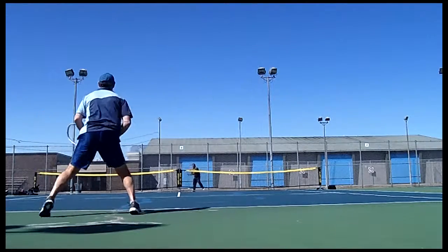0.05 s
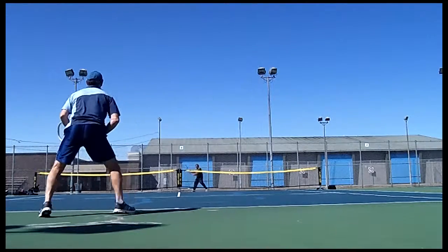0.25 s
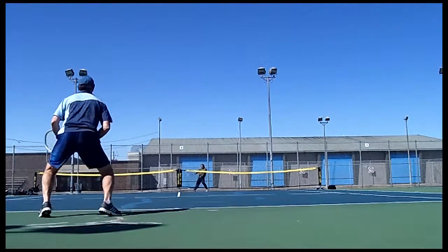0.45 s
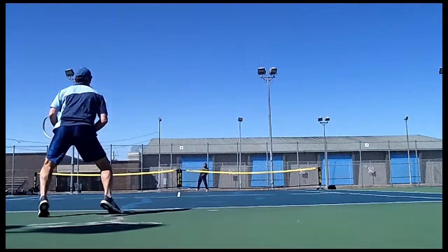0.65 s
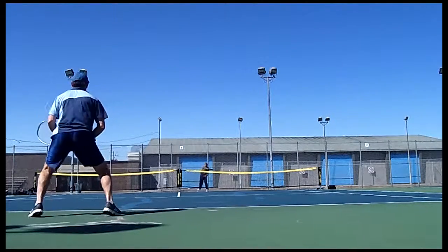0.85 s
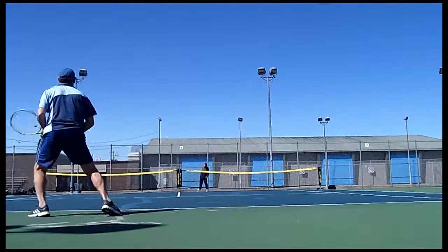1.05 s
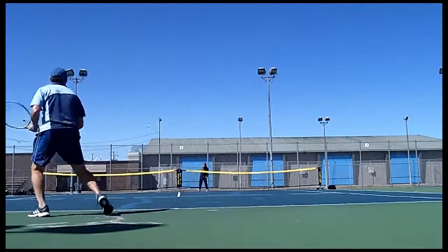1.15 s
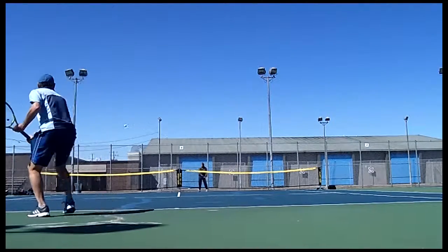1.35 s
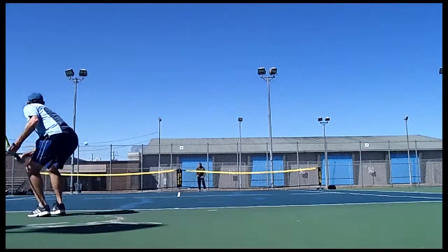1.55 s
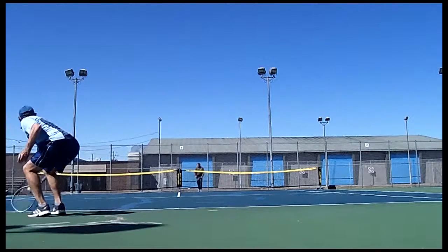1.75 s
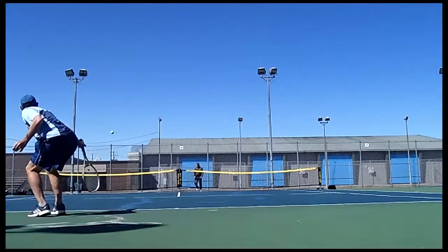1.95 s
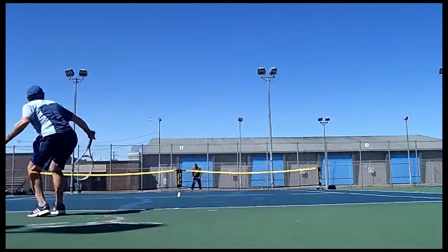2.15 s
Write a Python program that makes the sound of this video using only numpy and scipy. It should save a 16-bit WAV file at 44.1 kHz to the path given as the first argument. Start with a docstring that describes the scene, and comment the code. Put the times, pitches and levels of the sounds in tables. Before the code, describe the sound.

Two racket hits on a tennis ball, distant then near, amid squeaking shoes and wind.

```python
"""An outdoor hard tennis court, heard from behind the baseline during a rally.
A racket hits the ball twice, once farther off and once close by: a crack, a thump and ringing strings.
Rubber soles squeak as they stick and slip, and scuff as they drag over the gritty paint.
Fences and walls send back a thin echo, and wind buffets the microphone over a steady outdoor rush."""
import sys
import numpy as np
from scipy import signal
from scipy.fft import rfft, irfft
from scipy.io import wavfile
from scipy.ndimage import uniform_filter1d

SR = 44100
rng = np.random.default_rng(int(sys.argv[2]) if len(sys.argv) > 2 else 0)


def materialize(psi):
    """Save the field psi as 16-bit PCM at rate SR to the path in sys.argv[1].

    A 1-D psi becomes a single channel; in a 2-D psi each row is a channel.
    """
    bounded = np.clip(np.atleast_2d(psi).T, -1, 1)
    quanta = np.round(bounded * 32767).astype(np.int16)
    wavfile.write(sys.argv[1], SR, quanta)


N = 97020  # 2.2 seconds
FLUTTER_DB, FLUTTER_HZ = 2, 35.29  # how much and how fast the wind's loudness wavers


def ball_hits():
    """A hit cracks and rings the strings; the ball flattens with a thump and rings as it springs back."""
    # racket hits (time [s], thump level [dB], thump pitch [Hz], ball level [dB], ball pitch [Hz],
    # strings level [dB], crack level [dB], crack treble boost [dB per octave])
    hits = [(0.7126, -18, 382, -11.5, 1117, -44.5, -24, -4), (1.9108, -2.5, 321, -8, 970, -18, -13.5, 1.8)]
    # tones of the strings and frame (pitch [Hz], level [dB], time to fade by 60 dB [s])
    racket_tones = [(555, -7, 0.022), (802, 7.5, 0.03), (1090, 0, 0.031), (1240, 3.5, 0.038),
                    (1478, -19, 0.039), (1669, -7, 0.098), (2090, -4, 0.0254), (2266, 0.5, 0.022),
                    (2594, -1, 0.034), (2910, -7, 0.022), (3468, 0, 0.025), (3690, -9, 0.028),
                    (4470, -2, 0.021), (7230, -12.5, 0.025)]
    # tone colour of the crack (frequency [Hz], level [dB])
    crack_colour = [(200, 6.5), (800, 2.5), (1500, 10), (2400, -1), (3600, -8.5), (4800, -13.5),
                    (6000, -14), (7300, -23), (9000, -27), (12000, -47), (16000, -43)]
    out = np.zeros(N)
    for start, thump_db, thump_hz, ball_db, ball_hz, strings_db, crack_db, tilt_db in hits:
        out += undb(thump_db) * ring(start + 0.00093, thump_hz, rise_s=0.00073, fade_s=0.015)
        out += undb(ball_db) * ring(start + 0.0044, ball_hz, rise_s=0.001, fade_s=0.0135)
        for k, (hz, db, fade_s) in enumerate(racket_tones):
            direction = (-1) ** k  # neighbouring tones start in opposite directions
            out += direction * undb(strings_db + db) * ring(start, hz, rise_s=0.002, fade_s=fade_s)
        crack = noise(crack_colour, tilt_db) * hit_shape(clock(start), rise_s=0.00078, fade_s=0.028)
        out += undb(crack_db) * crack
    return out


def shoe_squeaks():
    """Rubber sticks and slips; the pitch sags as the sole presses harder, and poor grip makes it ragged."""
    # squeaking soles (time [s], length [s], level [dB], rise [s], start pitch [Hz], end pitch [Hz],
    # fade over the slide [dB], roughness [0-1])
    squeaks = [(0.4671, 0.043, -12, 0.0043, 3146, 3170, 14.5, 0.21),
               (0.872, 0.024, -40, 0.005, 2820, 2070, 9, 0.6),
               (0.9168, 0.0043, -13.5, 0.0068, 2800, 2680, -3, 0.18),
               (0.9215, 0.0124, -14.5, 0.0014, 2842, 2626, 3.5, 0.28),
               (1.571, 0.023, -46.5, 0.0025, 3440, 3120, -7, 0.8),
               (1.594, 0.0153, -36.5, 0.0021, 3007, 2550, 8, 0.97),
               (0.503, 0.011, -26.5, 0.0037, 2494, 2290, 7.5, 0.73)]
    wobble_hz = 702.6  # how fast pitch and loudness wobble
    out = np.zeros(N)
    for start, length, db, rise_s, from_hz, to_hz, fade_db, roughness in squeaks:
        progress = np.minimum(clock(start) / length, 1)
        grip = slide_shape(start, length, rise_s, fall_s=0.0022) * undb(-fade_db * progress)
        glide_hz = from_hz + (to_hz - from_hz) * progress
        sag = 0.0448 * grip / grip.max()
        wobble = 0.07 * roughness * wander(wobble_hz)
        phase = 2 * np.pi * np.cumsum(glide_hz * (1 - sag + wobble)) / SR
        tone = np.sin(phase) + undb(-37) * np.sin(2 * phase)  # with a faint tone one octave up
        flicker_db = 3 * roughness * wander(wobble_hz)
        out += tone * grip * undb(db + flicker_db)
    return out


def shoe_scuffs():
    """Soles drag over the grains of the court paint, making short, scratchy bursts of noise."""
    # dragging soles (time [s], length [s], level [dB], rise [s], fall [s], treble boost [dB per octave])
    scuffs = [(0.344, 0.032, -52, 0.0083, 0.019, -6.5), (0.454, 0.016, -42, 0.0021, 0.003, 2.5),
              (0.468, 0.045, -36.5, 0.005, 0.012, 0.5), (0.839, 0.044, -46, 0.036, 0.0051, 0),
              (0.875, 0.022, -32.5, 0.011, 0.018, -1.5), (0.9104, 0.028, -29.5, 0.03, 0.02, 2),
              (1.099, 0.066, -49, 0.071, 0.037, -4), (1.287, 0.042, -52, 0.016, 0.012, 1.5),
              (1.331, 0.022, -54, 0.006, 0.015, 1), (1.572, 0.042, -48.5, 0.0028, 0.009, 2.5)]
    # tone colour of a sole on grit (frequency [Hz], level [dB])
    grit_colour = [(400, -15), (1100, -9), (1600, 2.5), (2300, 8.5), (3200, 1), (4200, -3), (5200, -9),
                   (6400, -12), (7600, -24.5), (8600, -23.5), (10500, -54), (16000, -39)]
    out = np.zeros(N)
    for start, length, db, rise_s, fall_s, tilt_db in scuffs:
        scrape = noise(grit_colour, tilt_db)
        grain_db = 2.5 * wander(hz=1202)
        out += scrape * undb(db + grain_db) * slide_shape(start, length, rise_s, fall_s)
    return out


def court_echo(sound):
    """Sound scatters off nearby surfaces, bounces off a fence and leaves a faint, longer tail."""
    # tone colour of the scattered sound (frequency [Hz], level [dB])
    echo_colour = [(100, -16), (500, -1.5), (1000, -2.5), (1800, -2.5), (3200, -6.5), (6000, -4),
                   (16000, -4)]
    # bounce off the fence (delay [s], level [dB])
    fences = [(0.0177, -25.5)]
    t = clock(start=0.004)
    echoes = np.zeros(N)  # what the court sends back after a single click
    for db, fade_s in [(-20, 0.075), (-30, 0.32)]:  # near scatter, then the longer tail
        tail = noise(echo_colour) * hit_shape(t, rise_s=0.0049, fade_s=fade_s)
        echoes += undb(db) * tail / np.linalg.norm(tail)
    for delay, db in fences:
        echoes[int(delay * SR)] += undb(db)
    bass_cut = signal.butter(2, 600, "high", fs=SR, output="sos")
    return signal.fftconvolve(sound, signal.sosfilt(bass_cut, echoes))[:N]


def wall_echo(sound, delay_s=0.0725, level_db=-25):
    """A wall slaps the sound back once, mostly its middle frequencies."""
    # range the wall sends back best (low edge [Hz], high edge [Hz])
    band_hz = [1000, 1600]
    keep_middle = signal.butter(2, band_hz, "band", fs=SR, output="sos")
    delayed = np.interp(clock() - delay_s, clock(), sound, left=0)
    return undb(level_db) * signal.sosfilt(keep_middle, delayed)


def wind_buffets():
    """Wind rumbles on the microphone; each strong swirl of air pushes the pressure up, then down."""
    # tone colour of the rumble (frequency [Hz], level [dB])
    rumble_colour = [(20, -12), (35, -10.5), (60, 3), (100, 2.5), (150, -1), (200, -7.5), (280, -16),
                     (450, -32.5), (800, -31.5), (2000, -92.5), (8000, -87)]
    # strength of the rumble as it comes and goes (time [s], level [dB])
    strength = [(0, -44.5), (0.14, -44.5), (0.25, -36.5), (0.33, -42), (0.40, -37), (0.52, -37),
                (0.60, -36), (0.73, -40.5), (0.80, -33), (0.87, -42.5), (1.0, -35), (1.12, -37.5),
                (1.2, -39.5), (1.29, -42), (1.38, -47.5), (1.7, -55), (1.87, -41.5), (2.1, -48.5),
                (2.2, -46)]
    # swirls hitting the microphone (time [s], level [dB], pitch [Hz])
    buffets = [(0.165, -27.5, 80), (0.2098, -17.5, 118), (0.289, -21.5, 112), (0.546, -26, 100),
               (0.573, -22, 105), (0.604, -23.5, 100), (0.626, -23.5, 95), (0.679, -26, 100),
               (0.786, -31, 160), (0.805, -22.5, 150), (0.9028, -20.5, 105), (0.977, -23.5, 100),
               (1.011, -28, 130), (1.096, -28, 130), (1.128, -25, 120), (1.488, -29.5, 115),
               (1.8812, -20, 125)]
    t = clock()
    rumble_db = np.interp(t, *np.array(strength).T)
    out = noise(rumble_colour) * undb(rumble_db + FLUTTER_DB * wander(FLUTTER_HZ))
    for when, db, hz in buffets:
        cycles = (t - when) * hz
        out -= undb(db) * np.sin(2 * np.pi * cycles) * bell_shape(cycles, width=0.41)
    return out


def wind_gust(peak_s=0.96, level_db=-41):
    """One gust swells and passes, adding smaller swirls with a higher sound."""
    # tone colour of the small swirls (frequency [Hz], level [dB])
    swirl_colour = [(60, -20), (120, -2.5), (165, 0), (230, -5.5), (300, -17.5), (420, -15.5), (700, -32.5),
                    (2000, -49), (8000, -85)]
    swell = bell_shape(clock() - peak_s, width=0.21)
    return noise(swirl_colour) * swell * undb(level_db + FLUTTER_DB * wander(FLUTTER_HZ))


def outdoor_rush(level_db=-48.5, swell_db=0.57):
    """Distant wind and town blend into a steady rush that swells slightly."""
    # tone colour of the rush (frequency [Hz], level [dB])
    rush_colour = [(20, 3), (55, 7), (120, -9.5), (220, -3), (420, -1.5), (700, -10), (1250, -8.5),
                   (1800, -15), (2800, -18.5), (3900, -19.5), (4500, -32), (6500, -35.5), (7700, -38),
                   (9500, -36), (16000, -37.5)]
    return noise(rush_colour) * undb(level_db + swell_db * wander(hz=5.79))


def undb(db):
    """Turn decibels into a number to multiply a sound by."""
    return 10 ** (np.asarray(db) / 20)


def clock(start=0):
    """Seconds since start, zero before it."""
    return np.maximum(np.arange(N) / SR - start, 0)


def noise(colour, tilt_db=0):
    """Noise of typical size 1, shaped by (frequency [Hz], level [dB]) points plus tilt_db per octave."""
    hz, db = np.array(colour).T
    octave = np.log2(np.maximum(np.arange(N // 2 + 1) * SR / N, 1))
    gain = undb(np.interp(octave, np.log2(hz), db + tilt_db * np.log2(hz)))
    shaped = irfft(rfft(rng.standard_normal(N)) * gain * (octave > 2), N)  # nothing below 4 Hz
    return shaped / shaped.std()


def wander(hz):
    """A random curve of typical size 1 that drifts to a new value about hz times a second."""
    step = max(int(SR / hz), 2)
    stairs = np.repeat(rng.standard_normal(N // step + 1), step)
    smooth = uniform_filter1d(stairs, step)[:N]
    return smooth / smooth.std()


def slide_shape(start, length, rise_s, fall_s):
    """The loudness of a sliding sole: it rises, holds if there is time, and falls."""
    t = clock(start)
    ramp = np.minimum(t / rise_s, (length - t) / fall_s)
    return np.sin(np.pi / 2 * np.clip(ramp, 0, 1))


def hit_shape(t, rise_s, fade_s):
    """The loudness of a hit: a rounded start, then a drop of 60 dB every fade_s seconds."""
    return (1 - np.exp(-(t / rise_s) ** 2)) * np.exp(-np.log(1000) * t / fade_s)


def bell_shape(x, width):
    """A smooth hump that is highest where x is zero."""
    return np.exp(-.5 * (x / width) ** 2)


def ring(start, hz, rise_s, fade_s):
    """One pure tone that is struck and dies away."""
    t = clock(start)
    return np.sin(2 * np.pi * hz * t) * hit_shape(t, rise_s, fade_s)


def scene():
    """Shoes and ball with their echoes, plus wind and the outdoor rush, in one channel."""
    play = shoe_squeaks() + shoe_scuffs() + ball_hits()
    mix = play + court_echo(play) + wall_echo(play) + wind_buffets() + wind_gust() + outdoor_rush()
    return mix[None]


def record(dry, top_hz=16200):
    """A steep filter cuts off the highest treble."""
    return signal.sosfilt(signal.ellip(10, .1, 70, top_hz, fs=SR, output="sos"), dry)


dry = scene()
out = record(dry)
materialize(out)
```